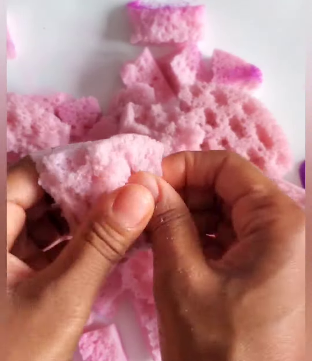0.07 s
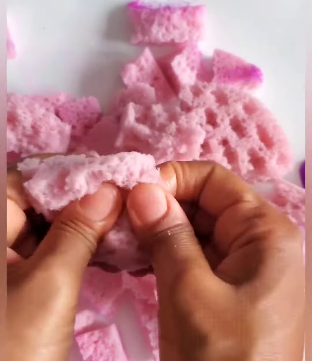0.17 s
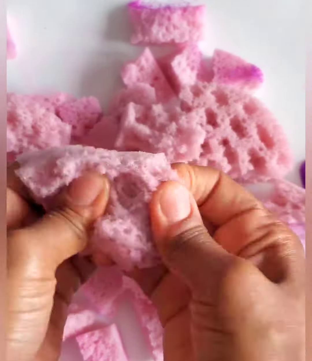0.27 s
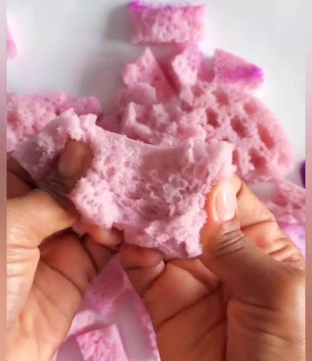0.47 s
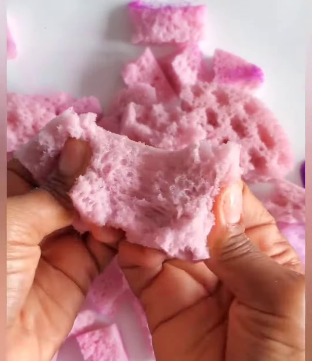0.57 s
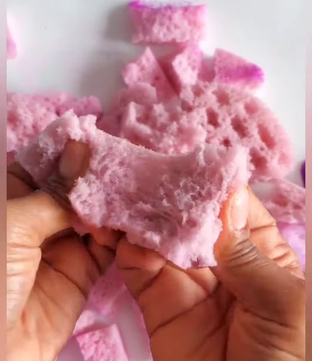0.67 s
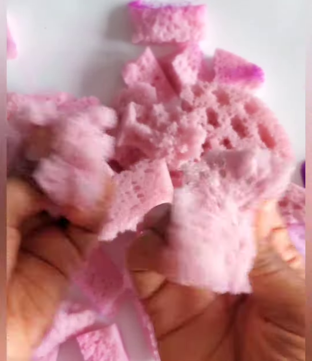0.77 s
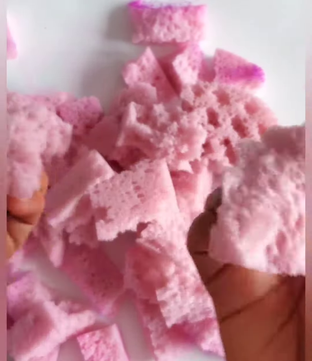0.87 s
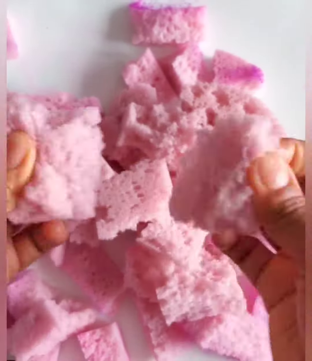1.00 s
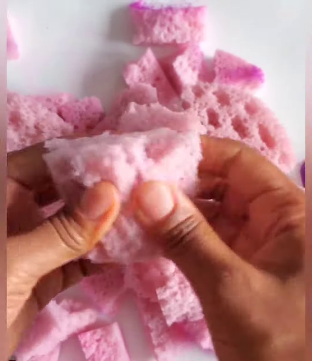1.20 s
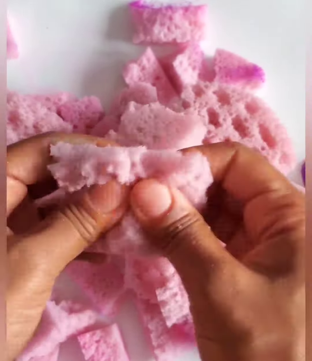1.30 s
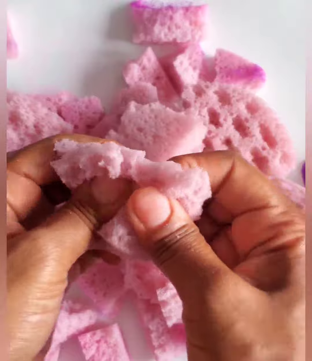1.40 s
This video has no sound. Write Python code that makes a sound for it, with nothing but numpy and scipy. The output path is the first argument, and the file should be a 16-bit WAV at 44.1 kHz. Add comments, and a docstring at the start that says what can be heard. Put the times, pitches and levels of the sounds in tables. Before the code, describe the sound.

A dry sponge is torn by hand, close to the microphone in a quiet room. A fizzy, crunchy rip eases into a quieter pull and ends in a sharp snap. Faint rubbing follows, then fingers crackle into foam again.

```python
"""Two hands tear a dry sponge close to a stereo microphone in a quiet room.
Over the room tone, fingers rub the foam and dig in. The first rip fizzes and crunches as
thousands of cell walls snap, and the stretched foam thuds softly as it gives. A quieter, longer
pull follows, then the last strand parts with a loud snap, a dry knock and a falling thump.
The halves rub faintly, and the fingers crackle into the next piece."""
import sys
import numpy as np
from scipy import signal
from scipy.fft import rfft, irfft, next_fast_len
from scipy.io import wavfile

SR = 44100
rng = np.random.default_rng(int(sys.argv[2]) if len(sys.argv) > 2 else 0)


def generate_wav(signal):
    """Clip the signal to [-1, 1] and save it as 16-bit WAV at the path in sys.argv[1]."""
    frames = np.transpose(np.atleast_2d(signal))
    scaled = np.clip(frames, -1, 1) * 32767
    pcm = np.round(scaled).astype(np.int16)
    wavfile.write(sys.argv[1], SR, pcm)


N = 63945

# Room tone EQ. Each row: frequency in Hz, left gain in dB, right gain in dB.
ROOM_TONE_EQ = [(20, -16, -12), (44.6, -4, -2), (73.5, 3, 1), (110, -10.5, -5), (222, -15.5, -12),
                (367, -10, -6.5), (620, -26, -24), (806, -22, -32.5), (1120, -17.5, -30),
                (1700, -15.5, -30.5), (2230, -22.5, -31), (5000, -32, -35), (9200, -31, -45),
                (16000, -40, -35)]
# Stereo width of the room tone. Each row: frequency in Hz, side gain in dB.
ROOM_TONE_WIDTH = [(50, -9), (400, -10), (1000, -1.5), (3000, 1), (16000, 3)]
# Faint hum. Each row: frequency in Hz, level in dB.
HUM_TONES = [(177.6, -81), (360.7, -83)]
# Skin rubbing on foam. Each row: time in seconds, level in dB.
RUB_ENVELOPE = [(0, -80), (0.14, -73.5), (0.8, -61.5), (0.88, -59.5), (0.92, -65.5), (1.02, -69.5),
                (1.06, -74.5), (1.2, -78.5), (1.3, -72), (1.45, -77)]
# Tone of the rub. Each row: frequency in Hz, left gain in dB, right gain in dB.
RUB_EQ = [(300, -8.5, -17), (1000, -4, -11), (1760, 0.5, -14), (2780, -1.5, -9.5), (4570, -1.5, -7.5),
          (6650, -0.5, 0), (9600, -7, -6), (12000, -5, -0.5), (15500, -3.5, 2)]
# Fingertips digging in, one envelope per grip. Each row: time in seconds, level in dB.
GRIP_ENVELOPES = [
    [(0.16, -77), (0.195, -60), (0.215, -56.5), (0.24, -51.5), (0.28, -49.5), (0.31, -75)],
    [(1.33, -94), (1.395, -67), (1.402, -61.5), (1.43, -59), (1.45, -54.5)],
]
# Crackles in the second grip. Each row: start in seconds, level in dB.
GRIP_CRACKLES = [(1.3795, -59), (1.3828, -70), (1.4005, -52), (1.405, -58), (1.4129, -49), (1.4212, -47),
                 (1.4325, -48.5), (1.4455, -55)]
# Tone of squeezed foam. Each row: frequency in Hz, left gain in dB, right gain in dB.
GRIP_EQ = [(590, -34, -32), (1580, -15, -17), (2350, -6, -13), (2930, 5.5, -1), (3540, -15.5, -6.5),
           (4600, -9.5, -7.5), (5770, -12.5, -6.5), (6750, -2, 1.5), (9500, -20, -11), (12000, -14, -6.5),
           (15300, -14, -6)]
# Tone of snapping foam. Each row: frequency in Hz, left gain in dB, right gain in dB.
FOAM_EQ = [(700, -10, -7), (950, -6, -14), (1250, -8, -8), (1550, -7, -4), (1850, -6, -5), (2200, 0, -2),
           (3100, -1, -2), (3700, -9, -8), (4150, -9, -4), (4650, -13, -9), (5300, -6, -5), (6050, -7, -7),
           (6450, -6, -2), (7400, -14, -5), (8200, -11, -7), (9200, -20, -8), (10700, -10, -7),
           (11600, -13, -4), (12300, -9, -4), (13700, -15, -2), (15400, -9, -2)]
# Fizz of thin walls in the rip, the pull and the parting. Each row: time in seconds, relative level in dB.
FIZZ_ENVELOPES = [
    [(0.15, -78), (0.188, -62.5), (0.196, -60), (0.23, -54), (0.278, -39.5), (0.296, -42), (0.352, -36),
     (0.382, -42.5), (0.43, -61.5)],
    [(0.43, -67), (0.462, -48), (0.478, -52.5), (0.496, -43.5), (0.614, -58), (0.642, -50), (0.7, -67.5)],
    [(0.7, -67.5), (0.732, -49.5), (0.75, -59.5), (0.758, -50.5), (0.806, -31.5), (0.814, -43.5),
     (0.836, -58.5), (0.85, -56.5)],
]
# Airy top of the fizz. Each row: time in seconds, treble gain in dB.
AIR_ENVELOPE = [(0.2, 6), (0.3, -2.5), (0.38, 3), (0.46, 6.5), (0.74, 7.5), (0.8, 1), (0.83, -7)]
# Crunch of thick strands in the same three stages. Each row: time in seconds, relative level in dB.
CRUNCH_ENVELOPES = [
    [(0.22, -74), (0.242, -54), (0.322, -42.5), (0.33, -38.5), (0.36, -38), (0.426, -56.5), (0.43, -68)],
    [(0.43, -67.5), (0.442, -53.5), (0.534, -47.5), (0.588, -54), (0.6, -59.5), (0.648, -52), (0.68, -60.5),
     (0.7, -82)],
    [(0.7, -58), (0.756, -54.5), (0.806, -37), (0.824, -53), (0.86, -77)],
]
# Strong strands breaking.
# Each row: start in seconds, relative level in dB, share of crunch from 0 to 1, decay in seconds.
STRAND_SNAPS = [(0.1963, -45, 0, 0.00094), (0.1996, -47, .05, 0.0013), (0.2164, -47, 0.02, 0.00066),
                (0.4452, -39.5, 0.8, 0.0011), (0.4612, -46.5, 0.07, 0.0018), (0.4678, -48, .9, 0.00063),
                (0.4925, -40.5, 0.6, 0.0011), (0.528, -46, 0, 0.00054), (0.5755, -47, 0.17, .0008),
                (0.6415, -45, 0.4, 0.0011), (0.681, -50, 0, 0.0012), (0.7345, -49, 0.3, 0.00063),
                (0.7585, -46.5, 0.14, 0.005), (0.7872, -42, .4, 0.0011), (0.8036, -29.5, 0.03, 0.0016),
                (0.812, -46, 0.4, 0.00073)]
# Rumble of the pulling hands. Each row: time in seconds, level in dB.
HAND_ENVELOPE = [(0.22, -79), (0.26, -65), (0.38, -62.5), (0.6, -65.5), (0.72, -67), (0.82, -62.5),
                 (0.9, -69)]
# Tone of that rumble. Each row: frequency in Hz, gain in dB.
HAND_EQ = [(15, -23), (35, -1.5), (70, 3.5), (120, -5), (180, -5), (300, -32.5), (800, -50)]
# Thuds of stretched foam, one envelope per stage. Each row: time in seconds, relative level in dB.
THUD_ENVELOPES = [
    [(0.24, -85), (0.296, -72), (0.325, -57), (0.352, -43.5), (0.378, -49), (0.392, -59.5), (0.43, -68)],
    [(0.43, -71.5), (0.474, -55), (0.508, -60.5), (0.532, -54.5), (0.622, -67), (0.654, -58.5), (0.72, -77)],
    [(0.72, -75), (0.748, -67), (0.792, -55), (0.803, -44), (0.813, -52), (0.83, -71), (0.85, -75)],
]
# The sponge's soft body. Each row: frequency in Hz before the pitch shift, gain in dB.
BODY_EQ = [(60, -30), (150, -18), (250, -4.5), (340, 1), (490, -3.5), (650, -13.5), (1000, -29.5),
           (2500, -38)]
# Pitch shift of the body: one ratio each for the rip, the pull and the parting.
BODY_PITCH_RATIOS = [1, 0.93, 1.07]
# Tone of the last strand's knock. Each row: frequency in Hz, gain in dB.
KNOCK_EQ = [(120, -17), (300, 0), (480, 3.5), (700, -12), (950, -6), (1500, -6), (3000, -5), (6000, -23)]
# Resonances of the hollow between hands and table. Each row: frequency in Hz, width in Hz, lift in dB.
HOLLOW_PEAKS = [(2184, 85, 3.5), (2670, 62, 3), (3110, 60, 3), (3386, 84, 5), (6140, 48, 0)]
# Reverb EQ that keeps the bass dry. Each row: frequency in Hz, gain in dB.
REVERB_EQ = [(100, -5), (400, -9), (900, 8.5), (2000, -3.5), (3000, -2), (6000, 2), (15000, 0)]

CLUMP_HZ, PAN_SPREAD_DB = 126, 7  # snaps come in little avalanches, scattered left and right
FIZZ_LAG_S, LAG_SPREAD_S = 0.00004, 0.000025  # delay at the right microphone
FIZZ_PER_S, SPLIT_HZ = 9000, 3730  # fizz lies above the split, crunch below
BASS_PAN_DB = [[-1.8], [1.8]]  # body and hands lean right
TIME = np.arange(N) / SR


def from_db(db):
    """Decibels to gain."""
    return 10 ** (np.asarray(db) / 20)


def unit_rms(x):
    """Scale to unit power."""
    return x / np.sqrt(np.mean(x ** 2) + 1e-20)


def envelope(*curves):
    """Summed gain of (seconds, dB) curves, each fading by 600 dB a second beyond its ends."""
    gain = np.zeros(N)
    for rows in curves:
        times, db = np.transpose(rows)
        outside_s = np.maximum(0, np.maximum(times[0] - TIME, TIME - times[-1]))
        gain += from_db(np.interp(TIME, times, db) - 600 * outside_s)
    return gain


def burst(start_s, db, decay_s):
    """Instant attack, exponential decay."""
    age = TIME - start_s
    return from_db(db) * (age >= 0) * np.exp(-np.abs(age) / decay_s)


def drift(hz):
    """Smooth random modulation at unit power."""
    pole = np.exp(-2 * np.pi * hz / SR)
    return unit_rms(signal.lfilter([1], [1, -2 * pole, pole * pole], rng.standard_normal(N + SR))[SR:])


def butter(x, hz, kind, order=4):
    """Butterworth high- or low-pass."""
    return signal.sosfilt(signal.butter(order, hz, kind, fs=SR, output="sos"), x)


def crossover(x, hz, kind):
    """One half of a band split whose halves add up flat."""
    return butter(butter(x, hz, kind, order=2), hz, kind, order=2)


def eq(x, table, column=1):
    """Minimum-phase EQ that follows one dB column of a table."""
    table, size = np.array(table, float), 2 * next_fast_len(N)
    hz = np.maximum(np.arange(size // 2 + 1) * SR / size, 1)
    gain = from_db(np.interp(np.log(hz), np.log(table[:, 0]), table[:, column]))
    cepstrum = irfft(np.log(gain))
    cepstrum[1:size // 2] *= 2
    cepstrum[size // 2 + 1:] = 0
    return irfft(rfft(x, size) * np.exp(rfft(cepstrum)))[..., :N]


def stereo_eq(pair, table):
    """A separate EQ curve for each microphone."""
    return np.array([eq(pair[0], table, column=1), eq(pair[1], table, column=2)])


def clicks(per_s=20000, spread_db=0.5, clump_db=0, lag_s=0):
    """Random stereo clicks, each from its own spot along the tear; dense and even by default."""
    starts = np.flatnonzero(rng.random(N) < per_s / SR)
    size_db = spread_db * np.minimum(rng.exponential(1, N), 4) + clump_db * drift(CLUMP_HZ)
    sizes = (from_db(size_db) * rng.choice([-1, 1], N))[starts]
    pan, lag = rng.standard_normal((2, N))[:, starts]
    pan_gain = from_db(PAN_SPREAD_DB * pan / 2)
    delay = (lag_s + LAG_SPREAD_S * lag) * SR
    pair = np.zeros((2, N))
    pair[0, starts] = sizes * pan_gain
    for tap in range(-8, 9):  # sub-sample delay on the right
        np.add.at(pair[1], (starts + tap) % N, sizes / pan_gain * np.sinc(tap - delay))
    return pair


def room_tone():
    """A bed of low rumble, a little hiss and a faint wavering hum."""
    mid, side = rng.standard_normal((2, N))
    side = eq(side, ROOM_TONE_WIDTH)
    bed = unit_rms(stereo_eq([mid + side, mid - side], ROOM_TONE_EQ))
    hum = np.zeros(N)
    for hz, db in HUM_TONES:
        waver = 1 + 0.5 * drift(hz=7.5)
        hum += np.sqrt(2) * from_db(db) * waver * np.sin(2 * np.pi * (hz * TIME + rng.random()))
    return from_db(-69) * bed + hum


def rubbing():
    """Fingers slide over the foam with a fine hiss."""
    grains = clicks(FIZZ_PER_S, spread_db=1, clump_db=1.4)
    return unit_rms(stereo_eq(grains, RUB_EQ)) * envelope(RUB_ENVELOPE)


def grip():
    """Fingertips crush the surface cells: a thin scrunch with a few crackles."""
    grains = clicks(per_s=10000, spread_db=2, clump_db=1.5, lag_s=FIZZ_LAG_S)
    crackles = sum(burst(start_s, db, decay_s=0.0021) for start_s, db in GRIP_CRACKLES)
    squeeze = envelope(*GRIP_ENVELOPES) + crackles
    return stereo_eq(grains * squeeze, GRIP_EQ) / stereo_eq(grains, GRIP_EQ).std()


def fizz_band(pair):
    """Bright ring of thin cell walls."""
    return butter(stereo_eq(pair, FOAM_EQ), SPLIT_HZ, "high", order=6)


def ticks(per_s=420, spread_db=3, decay_s=0.00038):
    """Lone cell walls give way, each with a sharp little spurt."""
    triggers = rng.random(N) < per_s / SR
    sizes = from_db(spread_db * np.minimum(rng.exponential(1, N), 3))
    spurts = signal.lfilter([1], [1, -np.exp(-1 / (decay_s * SR))], triggers * sizes + 1e-18)
    return unit_rms(spurts * clicks(lag_s=FIZZ_LAG_S))


def fizz(merge_db=-41, air_hz=9800):
    """Thin walls snap by the thousand; on a hard pull the lone ticks sink into an even rasp."""
    pull = envelope(*FIZZ_ENVELOPES)
    lone_ticks = from_db(-7.5) * ticks() / np.hypot(1, pull / from_db(merge_db))
    rasp = unit_rms(clicks(FIZZ_PER_S, spread_db=1, clump_db=1, lag_s=FIZZ_LAG_S))
    walls = unit_rms(fizz_band(rasp + lone_ticks))
    air_gain = from_db(np.interp(TIME, *np.transpose(AIR_ENVELOPE)))
    walls = crossover(walls, air_hz, "low") + air_gain * crossover(walls, air_hz, "high")
    return walls * pull * from_db(1.5)


def crunch_band(pair):
    """Lower ring of thick strands."""
    lows = butter(stereo_eq(pair, FOAM_EQ), SPLIT_HZ, "low", order=6)
    return butter(lows, 700, "high")


def snaps(low_cut_hz=1510):
    """A strong strand breaks and takes its neighbours along within a few milliseconds."""
    bright, dull = np.zeros((2, N))
    for start_s, db, crunch_share, decay_s in STRAND_SNAPS:
        snap = burst(start_s, db, decay_s)
        bright += snap * np.sqrt(1 - crunch_share)
        dull += snap * np.sqrt(crunch_share)
    thin, thick = clicks(lag_s=FIZZ_LAG_S), clicks()
    top = fizz_band(thin * bright) / fizz_band(thin).std()
    mids = crunch_band(thick * dull) / crunch_band(thick).std()
    return 2 * (top + butter(mids, low_cut_hz, "high", order=3))  # single strands are too small to ring low


def crunch(deep_hz=1580, deep_growth=0.47):
    """Thick strands break; the harder the pull, the deeper the crunch."""
    breaks = unit_rms(clicks(per_s=4000, spread_db=3, clump_db=0.24))
    strands = unit_rms(crunch_band(breaks + from_db(-7.5) * ticks() * tick_gain()))
    pull = envelope(*CRUNCH_ENVELOPES) * from_db(-2)
    depth = from_db(-3) * (pull / pull.mean() / 2) ** deep_growth
    return pull * (crossover(strands, deep_hz, "high") + depth * crossover(strands, deep_hz, "low"))


def tick_gain(merge_db=-41):
    """Hard tearing ducks the lone ticks in the crunch."""
    return 1 / np.hypot(1, envelope(*FIZZ_ENVELOPES) / from_db(merge_db))


def hands():
    """The straining hands rumble faintly."""
    rumble = unit_rms(eq(rng.standard_normal(N), HAND_EQ))
    return rumble * envelope(HAND_ENVELOPE) * from_db(BASS_PAN_DB)


def thuds():
    """Each give of the foam nudges the whole sponge."""
    nudges = clicks(per_s=700, spread_db=3.5, clump_db=1)
    body = sum(unit_rms(eq(nudges, np.array(BODY_EQ) * [pitch, 1])) * envelope(stage)
               for stage, pitch in zip(THUD_ENVELOPES, BODY_PITCH_RATIOS))
    return body * from_db(0.5) * from_db(BASS_PAN_DB)


def knock():
    """The last strand lets go with a short dry knock."""
    grains = clicks()
    hit = burst(start_s=0.8025, db=-31.5, decay_s=0.0032)
    return eq(grains * hit, KNOCK_EQ) / eq(grains, KNOCK_EQ).std()


def parting_thump(start_s=0.803, from_hz=538, to_hz=39, glide_s=0.0069):
    """The halves spring apart with a thump that falls in pitch as the tension goes."""
    age = np.maximum(TIME - start_s, 0)
    hz = (to_hz + (from_hz - to_hz) * np.exp(-age / glide_s)) * (age > 0)
    sweep = np.sin(2 * np.pi * np.cumsum(hz) / SR)
    return sweep * burst(start_s, db=-41.5, decay_s=0.014) * from_db(BASS_PAN_DB)


def hollow(x):
    """The space between hands and table lifts a few narrow bands."""
    return x + sum((from_db(lift_db) - 1) * signal.lfilter(*signal.iirpeak(hz, hz / width, fs=SR), x)
                   for hz, width, lift_db in HOLLOW_PEAKS)


def table_echo(pair, lags_s=(0.0021, 0.0029)):
    """One early reflection off the table top, reaching the left microphone first."""
    return from_db(-20.5) * np.array([np.interp(TIME - lag, TIME, x) for lag, x in zip(lags_s, pair)])


def reverb(pair, t60_s=0.23, predelay_s=0.0055):
    """The room answers with a faint diffuse tail, different on each side."""
    t = np.arange(SR // 2) / SR
    tail = rng.standard_normal((2, len(t))) * from_db(-60 * t / t60_s) * (t > predelay_s)
    tail /= np.sqrt(np.sum(tail ** 2, axis=1, keepdims=True))
    return eq(from_db(-17.5) * signal.fftconvolve(pair, tail, axes=1)[:, :N], REVERB_EQ)


def scene():
    """The sponge tears above a table in a quiet room."""
    tearing = hollow(fizz() + crunch() + snaps() + grip() + rubbing())
    sponge = tearing + table_echo(tearing) + thuds() + knock() + parting_thump()
    return sponge + reverb(sponge) + hands() + room_tone()


def record(dry):
    """A steep low-pass takes off the very top."""
    return signal.sosfilt(signal.ellip(12, 0.1, 80, 15850, fs=SR, output="sos"), dry)


dry = scene()
out = record(dry)
generate_wav(out)
```